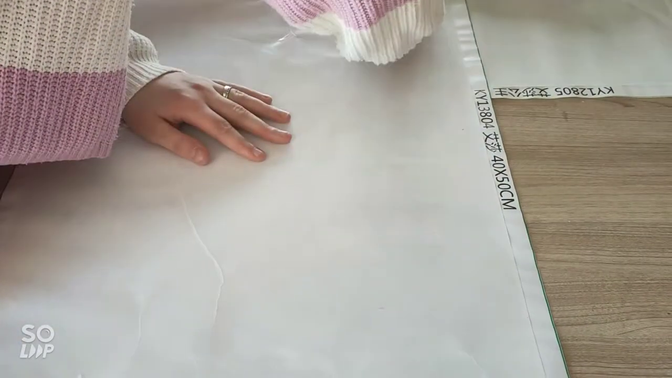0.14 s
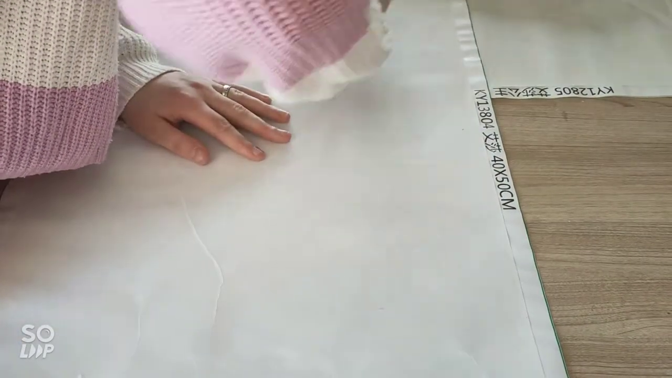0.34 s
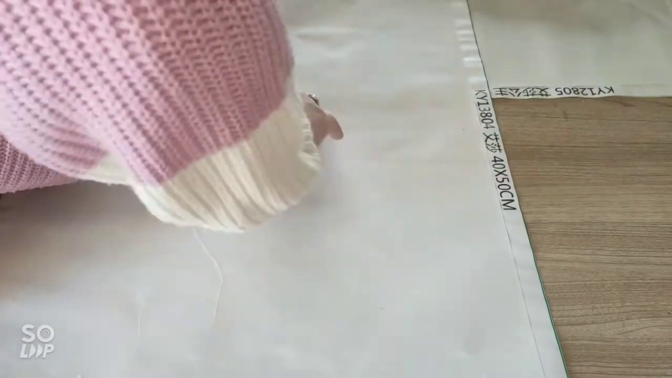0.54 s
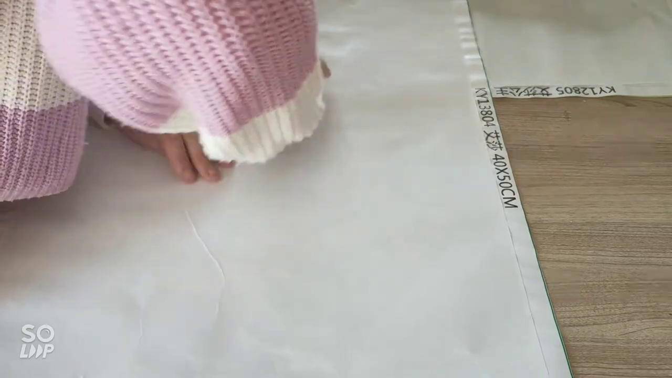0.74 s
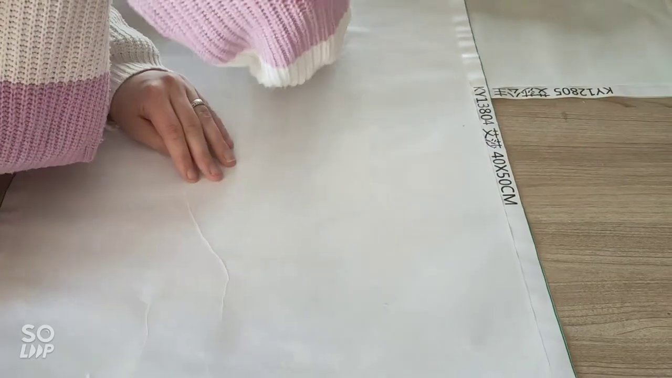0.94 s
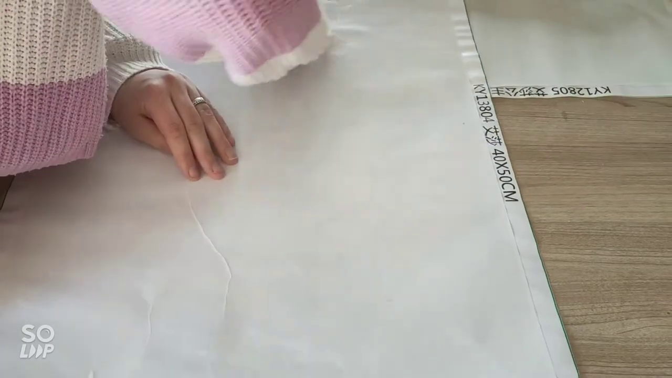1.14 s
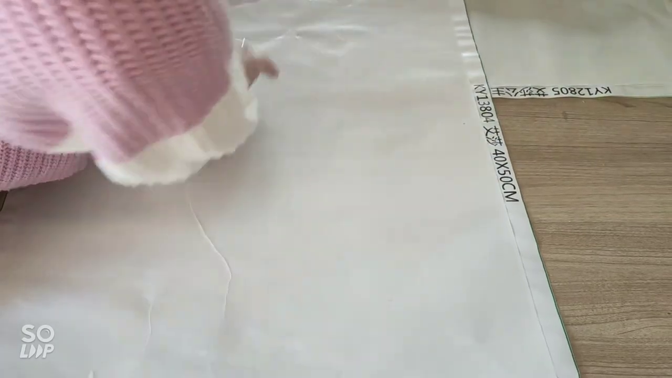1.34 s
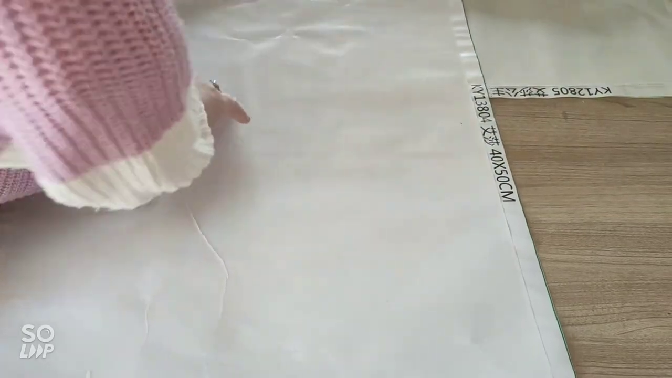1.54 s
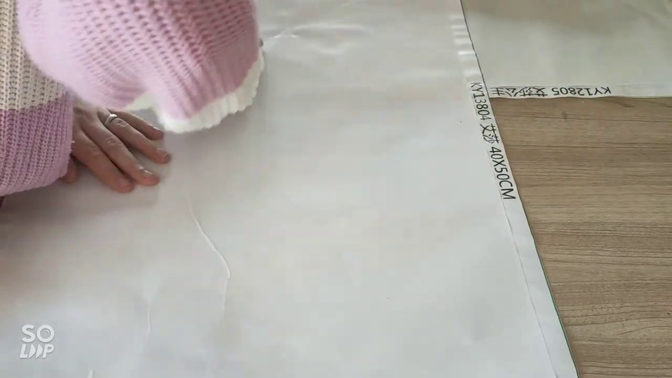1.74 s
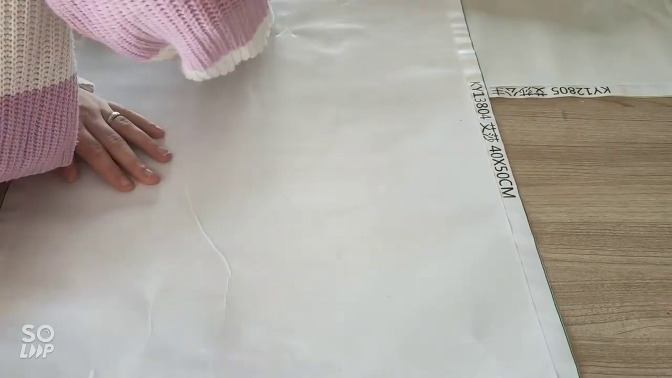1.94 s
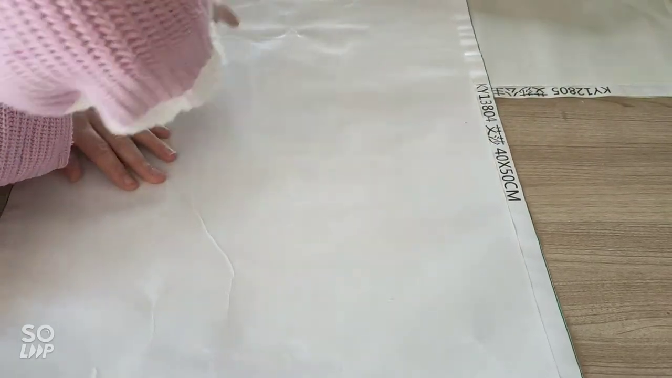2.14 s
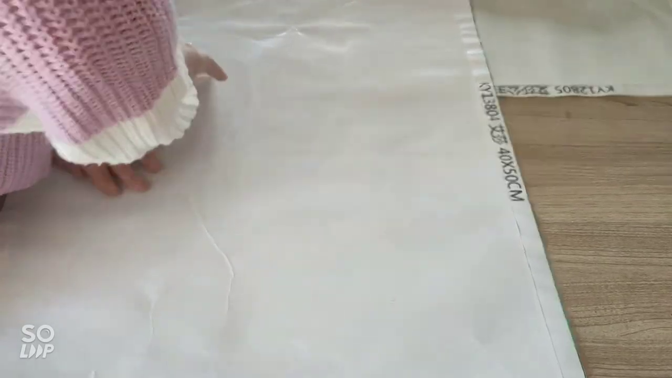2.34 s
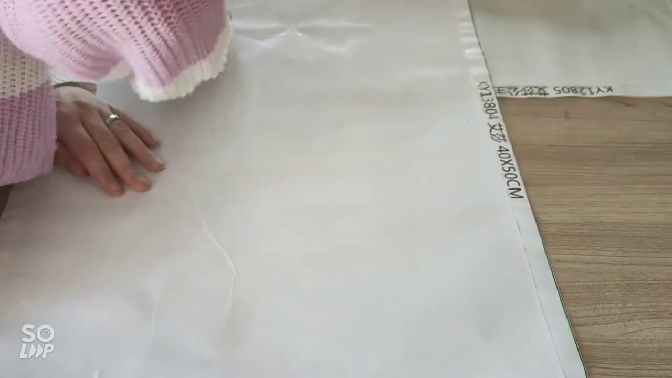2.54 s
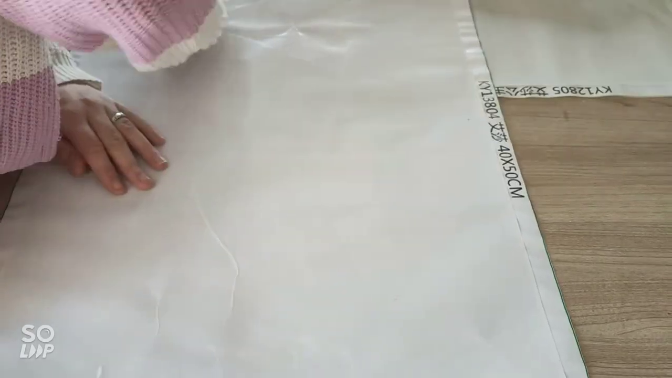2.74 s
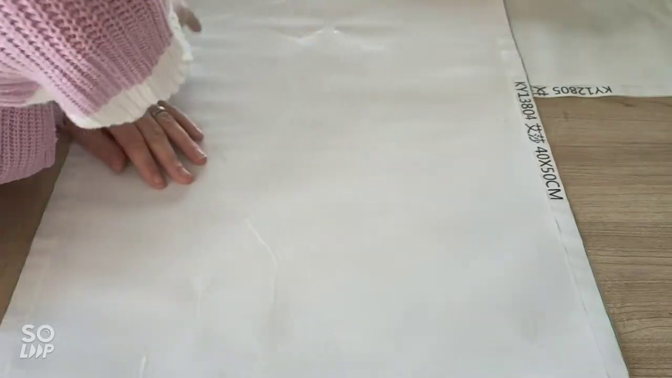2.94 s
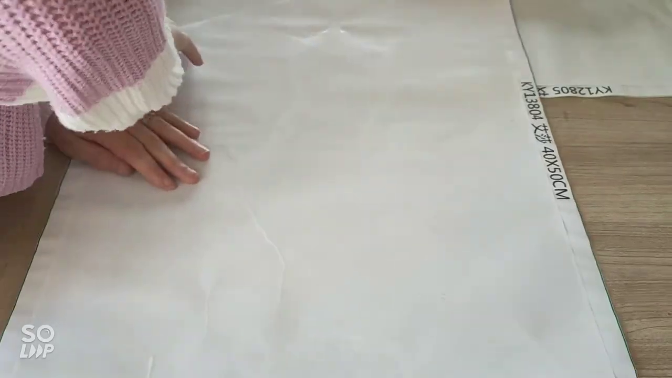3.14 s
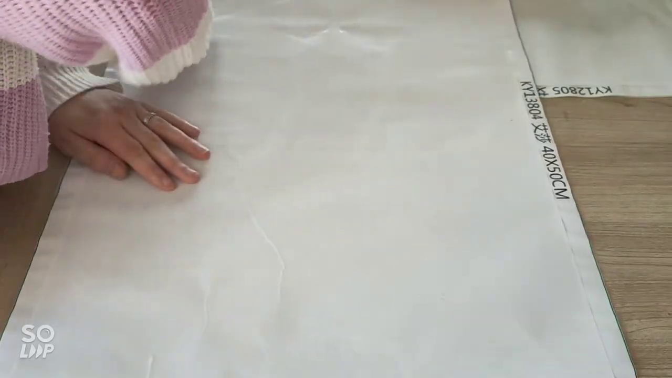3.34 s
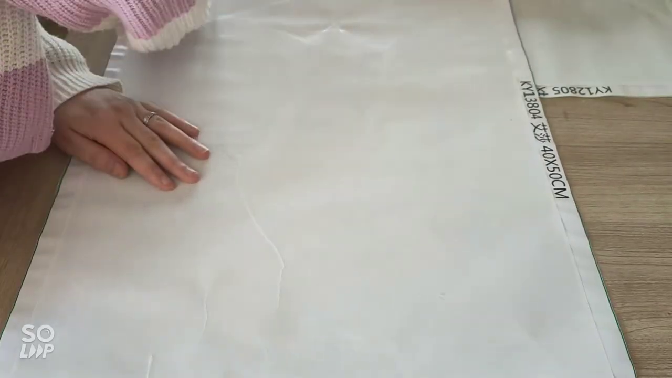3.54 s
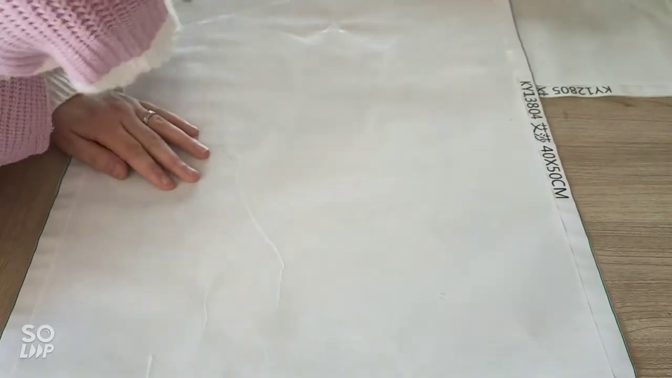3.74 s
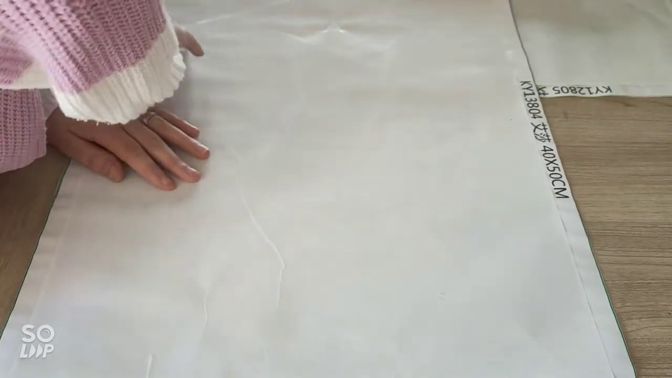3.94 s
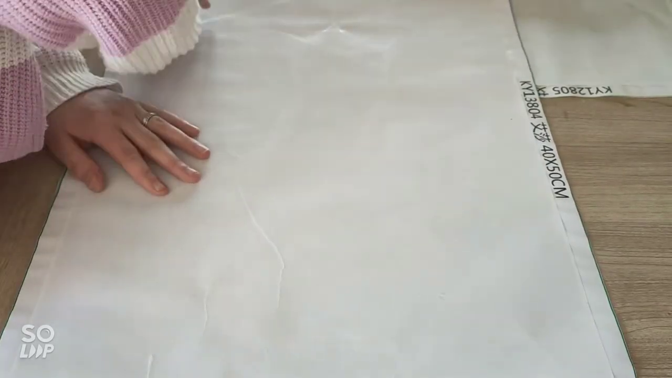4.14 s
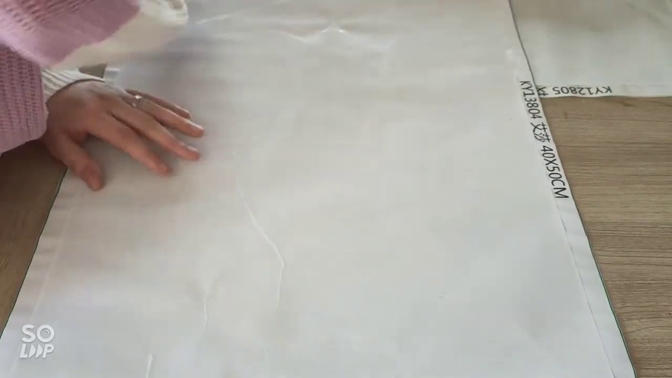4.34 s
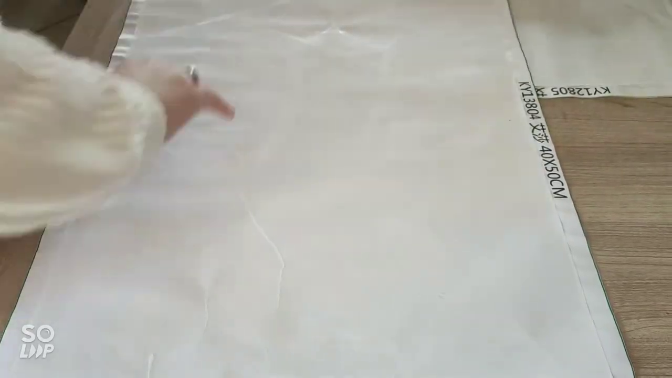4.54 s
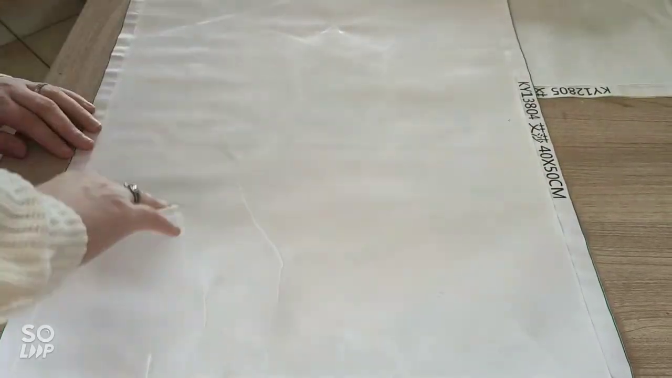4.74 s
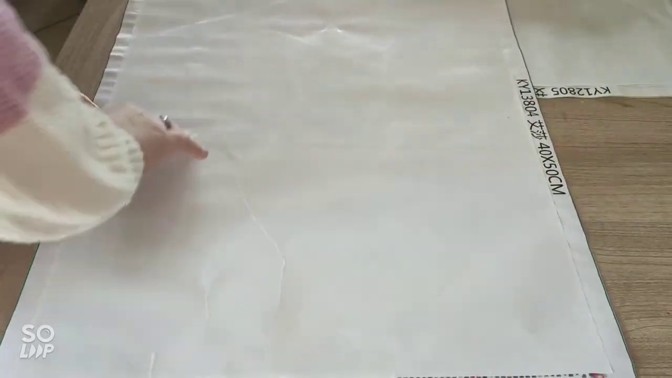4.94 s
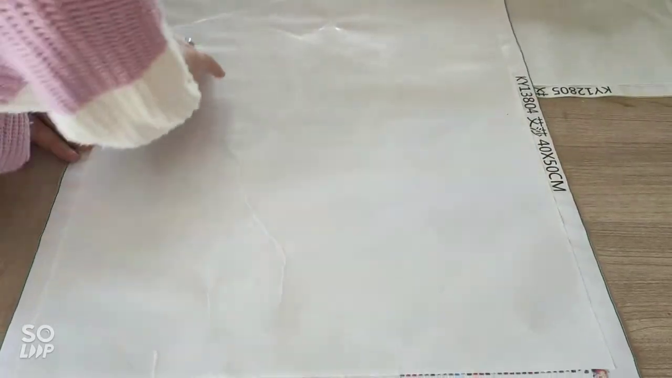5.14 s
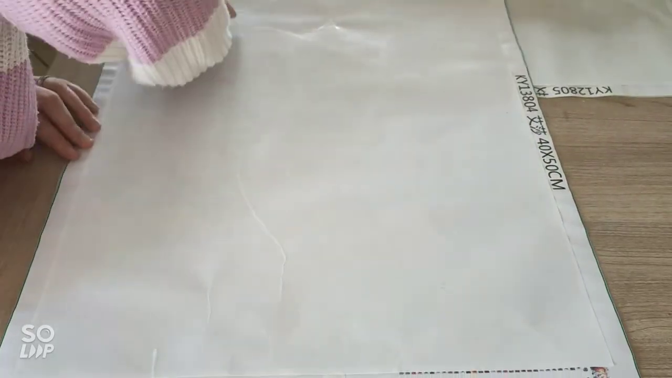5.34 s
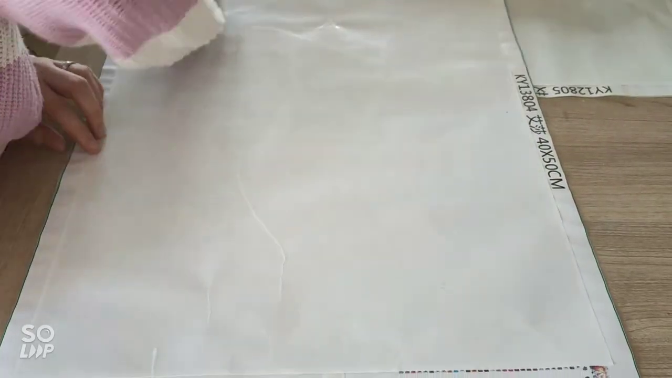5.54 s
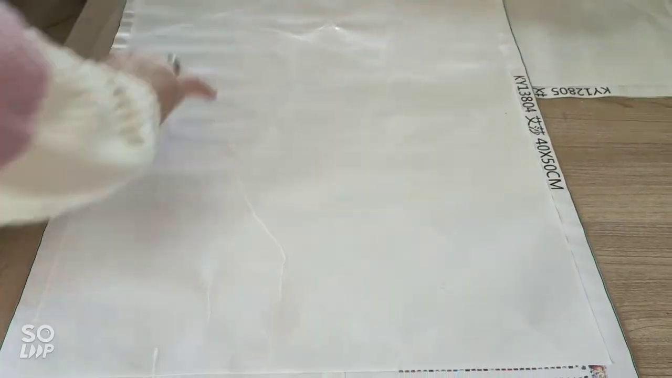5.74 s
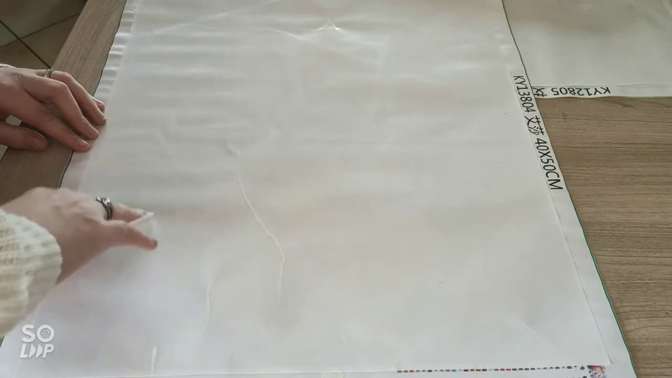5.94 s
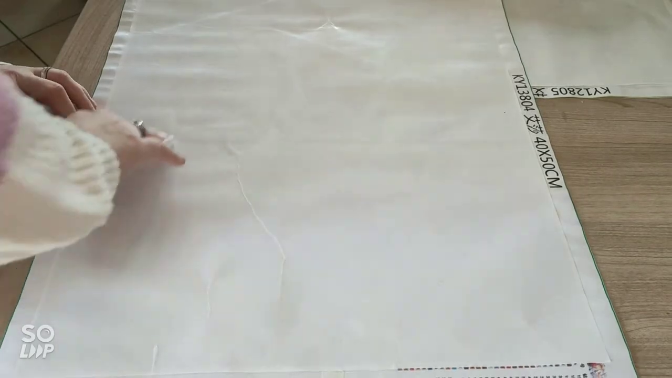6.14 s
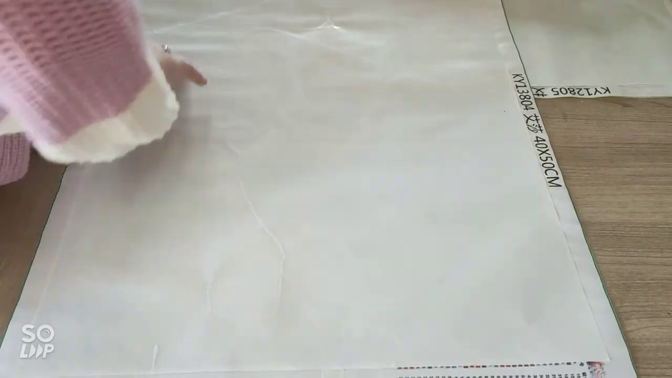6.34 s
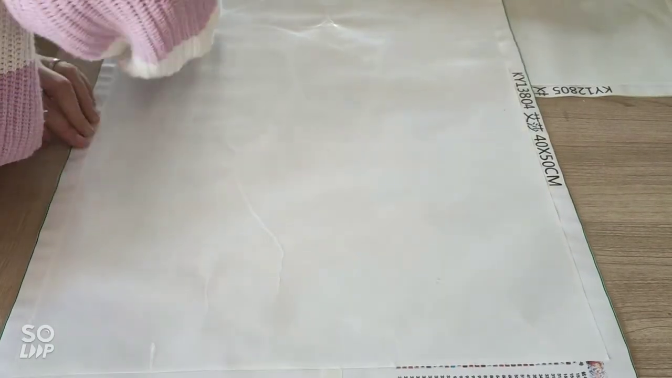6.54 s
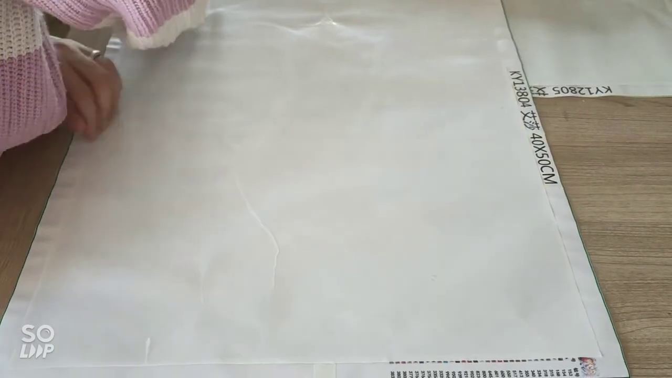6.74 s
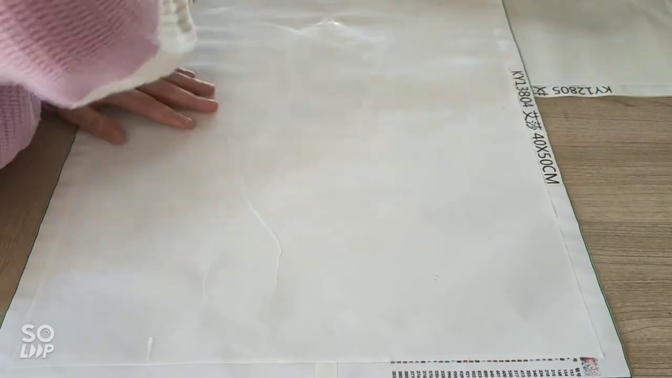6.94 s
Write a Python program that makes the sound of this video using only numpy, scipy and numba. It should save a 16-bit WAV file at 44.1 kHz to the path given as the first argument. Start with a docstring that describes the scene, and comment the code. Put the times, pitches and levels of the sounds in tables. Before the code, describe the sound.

Hands pat and smooth a paper sheet on a wooden table, with repeated soft thumps, hissing rubs and small crinkles.

```python
"""Hands smooth release paper over a sticky canvas on a wooden table in a small room, a little left of a
close pair of microphones. It opens mid-stroke over faint room tone: skin hisses on the paper and the
sheet rumbles under the palm. The heel of the hand bumps, and creases tick as they are pressed flat.
From 0.6 s the hand lands seven times, each time with a pat that thumps the table, and slides away.
The last two strokes are longer, and a few light brushes end it at about 7 s."""
import sys
import numpy as np
from scipy import signal
from scipy.fft import rfft, irfft, next_fast_len
from scipy.io import wavfile
from scipy.ndimage import map_coordinates
from numba import njit

SR = 44100
rng = np.random.default_rng(int(sys.argv[2]) if len(sys.argv) > 2 else 0)


def file_out(sig):
    """Save sig as 16-bit WAV at sys.argv[1]."""
    # one column per channel
    cols = np.atleast_2d(sig).T
    # limit, then scale
    lim = np.clip(cols, -1, 1)
    pcm = np.round(lim * 32767).astype(np.int16)
    wavfile.write(sys.argv[1], SR, pcm)


N = 312669
TIME = np.arange(N) / SR

# Slides of the palm: (time when fastest [s], run-up [s], run-out [s], skin hiss [dB], fine fizz [dB],
# paper scrape [dB], sheet rumble [dB], table rumble [dB], pressure gained on the way [dB],
# hiss centre [Hz], pitch that the palm favours in the sheet [Hz])
STROKES = [(0.02, 0.13, 0.19, -44.5, -54.5, -48, -56, -58, -12, 5940, 434),
           (0.88, 0.28, 0.23, -44.5, -51.5, -50, -52, -54, 12.5, 5720, 493),
           (1.769, 0.25, 0.26, -43, -51.5, -50.5, -52.5, -56.5, 6.5, 6760, 527),
           (2.58, 0.22, 0.2, -42, -57.5, -47.5, -50.5, -53.5, -0.5, 5950, 414),
           (3.422, .26, 0.2, -44, -56.5, -51.5, -57.5, -66, 4.5, 6000, 506),
           (4.15, .21, .21, -42.5, -56.5, -50, -61.5, -72.5, -1.5, 6000, 500),
           (5.162, .39, .42, -43, -54.5, -49.5, -51, -58, -10.5, 6300, 466),
           (6.5, 0.48, 0.38, -42, -55, -51, -57, -65.5, -6.5, 5700, 456)]


def from_db(db):
    """Decibels to gain."""
    return 10 ** (np.asarray(db) / 20)


def unit_rms(x):
    """Scale to unit rms."""
    return x / np.sqrt(np.mean(x ** 2) + 1e-20)


def unit_energy(x):
    """Scale a short sound to the energy of one millisecond at full level."""
    return x / np.sqrt(np.sum(x ** 2) * 1000 / SR)


def at_hz(points, hz):
    """Read a table on a log-frequency axis."""
    known_hz, values = np.transpose(points)
    return np.interp(np.log(np.maximum(hz, 1)), np.log(known_hz), values)


def in_time(rows):
    """The columns of a curve at every sample."""
    times, *columns = np.transpose(rows)
    return [np.interp(TIME, times, column) for column in columns]


def add(track, s, sound):
    """Mix a sound in at time s."""
    start = max(0, int(s * SR))
    track[start:start + len(sound)] += sound[:max(0, N - start)]


def drift(per_s):
    """A random curve of spread 1 that turns about per_s times a second."""
    knots = rng.standard_normal(N // 8)
    return 1.22 * np.interp(TIME * per_s, np.arange(len(knots)), knots)


def arch(offset, drop_db, shape):
    """A gain that is 1 at offset 0 and drop_db down at -1 and 1; a high shape flattens its top."""
    return from_db(-np.minimum(drop_db * np.abs(offset) ** shape, 100))


def coloured(x, spectrum, share=1, size=2048):
    """Minimum-phase filter that follows a spectrum, its decibels scaled by share."""
    gains = from_db(share * at_hz(spectrum, np.fft.rfftfreq(size, 1 / SR)))
    cepstrum = irfft(np.log(gains))
    cepstrum[1:size // 2] *= 2
    cepstrum[size // 2 + 1:] = 0
    return signal.oaconvolve(x, irfft(np.exp(rfft(cepstrum))))[:len(x)]


def resonance(x, hz, width_hz):
    """Two-pole resonance with gain 1 at its peak."""
    r = np.exp(-np.pi * width_hz / SR)
    feedback = [1, -2 * r * np.cos(2 * np.pi * hz / SR), r * r]
    return signal.lfilter(np.array([1, 0, -1]) * (1 - r * r) / 2, feedback, x)


@njit
def gliding_resonance(x, hz, width_hz):
    """Two-pole resonance whose centre is given for every sample."""
    r = np.exp(-np.pi * width_hz / SR)
    feedback = 2 * r * np.cos(2 * np.pi * hz / SR)
    y = np.zeros(len(x))
    for i in range(2, len(x)):
        y[i] = (1 - r * r) / 2 * (x[i] - x[i - 2]) + feedback[i] * y[i - 1] - r * r * y[i - 2]
    return y


def diffuse_noise(size, alike_below_hz=650):
    """Sound from all sides: alike at both microphones in the bass, unrelated in the treble."""
    mid, side = rfft(rng.standard_normal((2, size)))
    alike = 1 / (1 + (np.fft.rfftfreq(size, 1 / SR) / alike_below_hz) ** 2)
    return irfft(np.sqrt(1 + alike) * mid + np.sqrt(1 - alike) * side * [[1], [-1]], size)


def room_tone(level_db=-66):
    """The small room's faint, steady background, all around the microphones."""
    # Colour of the quiet room: (frequency [Hz], level [dB])
    spectrum = [(20, 5.5), (60, 17), (100, 7.5), (200, 1.5), (400, -4), (700, 0), (1500, -5), (4000, -10),
                (7500, -5), (9000, -15), (12500, -15.5), (14500, -8), (16000, -5)]
    noise = diffuse_noise(next_fast_len(N))[:, :N]
    return from_db(level_db) * unit_rms(np.array([coloured(side, spectrum) for side in noise]))


def hand_gains(lift_db_per_s=128):
    """Speed drives the gains of hiss and fizz; pressure those of scrape, sheet and table rumble."""
    # Fingers and cuff brush the paper: (time [s], half length [s], hiss [dB], scrape [dB], rumble [dB])
    brushes = [(0.171, 0.033, -56, -52, -46.5), (0.33, 0.033, -60, -54.5, -56.5), (0.5, 0.4, -64, -74, -78),
               (1.063, 0.056, -50, -49, -48), (1.213, 0.049, -49, -45, -53.5),
               (1.28, 0.22, -60.5, -91, -79), (1.506, 0.096, -53.5, -51.5, -57.5),
               (2.065, 0.25, -68.5, -65.5, -75), (2.966, 0.38, -55.5, -60.5, -86),
               (3.598, .07, -65, -62, -53), (3.691, 0.023, -48.5, -55.5, -62),
               (4.394, 0.36, -68, -71.5, -70), (5.454, 0.17, -52.5, -53, -50),
               (6.12, 0.18, -51, -51, -49.5), (6.771, 0.042, -63, -58.5, -51),
               (6.936, 0.076, -57, -60.5, -67), (7.08, 0.057, -55, -62.5, -82)]
    t, gains = TIME[::50], 0
    for s, run_up, run_out, *levels_db, lean_db, _, _ in STROKES:
        speed = arch((t - s) / np.where(t < s, run_up, run_out), drop_db=24, shape=2.3)
        way = (t - s + run_up) / (run_up + run_out) - .5   # -1/2 at the start, 1/2 at the end
        pressure = arch(2 * way, drop_db=24.5, shape=3.83) * from_db(lean_db * np.clip(way, -.5, .5))
        off_paper_s = np.clip(np.maximum(s - run_up - t, t - s - run_out), 0, 1)
        contact = from_db(-lift_db_per_s * off_paper_s)
        drives = [speed, speed ** 0.93, pressure * speed ** 0.053, pressure, pressure]
        gains = gains + contact * from_db(levels_db)[:, None] * drives
    for s, half_length, hiss_db, scrape_db, rumble_db in brushes:
        fizz_db, table_db = hiss_db - 11, rumble_db - 11.5
        touch = arch((t - s) / half_length, drop_db=28, shape=1.26)
        gains = gains + from_db([hiss_db, fizz_db, scrape_db, rumble_db, table_db])[:, None] * touch
    return [np.interp(TIME, t, gain) for gain in gains]


def hand_pitches(hiss_sag_octaves=0.096, palm_rise_octaves=0.64):
    """During a stroke the hiss sinks and the palm's pitch rises; both return before the next."""
    sag, rise = 2 ** (hiss_sag_octaves / 2), 2 ** (palm_rise_octaves / 2)
    points = []
    for s, run_up, run_out, *_, hiss_hz, palm_hz in STROKES:
        points.append((s - run_up, hiss_hz * sag, palm_hz / rise))
        points.append((s + run_out, hiss_hz / sag, palm_hz * rise))
    return in_time(points)


def slips(per_s, spread_db):
    """Friction: countless tiny slips of uneven size."""
    happens = rng.random(N) < per_s / SR
    sizes = from_db(spread_db * np.clip(rng.standard_normal(N), -2, 2))
    return happens * np.sign(rng.random(N) - .5) * sizes


def skin_friction(hiss_gain, fizz_gain, scrape_gain, hiss_hz, width_hz, broad_share):
    """Skin slides on paper: a hiss that follows the hand, a fine fizz above it, a dry scrape below."""
    # Colours of skin on paper, each: (frequency [Hz], level [dB])
    hiss_spectrum = [(1500, -22), (3000, -19), (4300, -5), (4800, 3), (5400, -3.5), (6200, -1.5),
                     (7400, -1), (8400, -8), (10000, -5.5), (16000, -25)]
    fizz_spectrum = [(5000, -26), (8500, 2.5), (11000, -1.5), (13200, -1), (15500, -4.5)]
    scrape_spectrum = [(300, -20), (900, -9), (1400, -6.5), (2100, -2), (3100, 2.5), (4200, 1.5),
                       (6000, -18.5), (12000, -32)]
    judder = from_db(1.67 * drift(per_s=450) + 0.8 * drift(per_s=45))   # the skin grips and lets go
    skin = slips(per_s=14000, spread_db=3.0) * judder
    tuned = gliding_resonance(skin, hiss_hz, width_hz)
    hiss = unit_rms(coloured(tuned + broad_share * skin, hiss_spectrum))
    fizz = unit_rms(coloured(slips(per_s=5900, spread_db=1.0) * judder, fizz_spectrum))
    scrape = unit_rms(coloured(slips(per_s=6000, spread_db=3.5) * judder, scrape_spectrum))
    return hiss_gain * hiss + fizz_gain * fizz + scrape_gain * scrape


def palm_rumble(sheet_gain, table_gain, palm_hz, wander_db=4.5, per_octave_db=7, stutter_db=3.2):
    """The palm drags on the sheet, which groans in its resonances, and its weight stirs the table."""
    # Resonances of the sheet under the palm: (frequency [Hz], width [Hz], level [dB])
    sheet_modes = [(312, 37, 1.5), (369, 35, 0.5), (485, 64, -0.5), (606, 130, -2), (780, 350, 0),
                   (1053, 120, 5), (1272, 61, -6.5)]
    # Rumble of the table under the hand's weight: (frequency [Hz], level [dB])
    table_spectrum = [(20, -60), (40, -6.5), (60, -14), (95, -16.5), (130, 4), (170, -6), (260, -11),
                      (700, -37)]
    sheet, power = 0, 0
    for hz, width_hz, db in sheet_modes:
        damping_db = per_octave_db * np.abs(np.log2(hz / palm_hz))   # weaker far from the palm's pitch
        gain = from_db(db + wander_db * drift(per_s=13) - damping_db)
        sheet = sheet + gain * unit_rms(resonance(slips(per_s=2500, spread_db=4.5), hz, width_hz))
        power = power + gain ** 2
    table = unit_rms(coloured(slips(per_s=420, spread_db=4.0), table_spectrum, size=4096))
    stutter = unit_rms(from_db(stutter_db * drift(per_s=25)))
    return stutter * (sheet_gain * sheet / np.sqrt(power) + table_gain * table)


def burst(rise_s, decay_s, size=4096):
    """A quick shower of tiny contacts, with an even spectrum so that it has no pitch."""
    t = TIME[:size]
    envelope = (1 - np.exp(-t / rise_s)) * np.exp(-t / decay_s)
    x = rng.standard_normal(size)
    for _ in range(4):   # shape in time, then flatten the spectrum
        x = irfft(np.exp(1j * np.angle(rfft(x * envelope))))
    return x * np.sqrt(envelope)


def thud(contacts, hz, width_hz):
    """A dull blow: contacts heard through a narrow and a wide resonance on one pitch."""
    return unit_energy(resonance(resonance(contacts, hz, width_hz), hz, 3 * width_hz))


def table_thump(rise_s, size=16384):
    """The wooden table rings briefly in its low modes after a push."""
    # Modes of the struck table and sheet: (frequency [Hz], level [dB], time to fall 60 dB [s])
    modes = [(60, -5, 0.074), (82, 7.5, 0.037), (121.5, -11.5, 0.13), (255, -6.5, 0.039)]
    t = TIME[:size]
    ring = sum(from_db(db - 60 * t / t60) * np.sin(2 * np.pi * hz * t) for hz, db, t60 in modes)
    return ring * (1 - np.exp(-t / rise_s)) / 2


def heel_bumps(thud_db=4):
    """The heel of the hand catches: it nudges the table, and the sheet gives a dull thud."""
    # Catches of the heel: (time [s], level [dB])
    catches = [(0.166, -41.5), (0.743, -43), (0.901, -38.5), (0.928, -43), (1.549, -43.5), (2.433, -50),
               (6.064, -44)]
    out = np.zeros(N)
    for s, db in catches:
        sheet = thud(burst(rise_s=0.0056, decay_s=0.00637), hz=135, width_hz=140)
        add(out, s, from_db(db) * table_thump(rise_s=0.0022))
        add(out, s, from_db(db + thud_db) * sheet)
    return out


def crease_ticks(crumple_db=-8, width_hz=7000):
    """A crease gives way with one tick and a short, weaker crumple."""
    # Creases snapping flat: (time [s], level [dB], centre [Hz])
    snaps = [(0.286, -55, 5030), (0.32, -54, 3000), (0.853, -25, 4200), (1.214, -32.5, 4970),
             (1.19, -44, 2600), (1.218, -29, 5530), (1.4798, -35, 4870), (1.507, -36, 8800),
             (1.554, -41, 4300), (1.8716, -30.5, 7030), (5.2876, -29, 5910), (6.754, -38.5, 5860)]
    out = np.zeros(N)
    for s, db, hz in snaps:
        tick = unit_energy(resonance(burst(rise_s=0.0011, decay_s=0.0012), hz, width_hz))
        crumple = unit_energy(resonance(burst(rise_s=0.0027, decay_s=0.0067), hz, width_hz))
        add(out, s, from_db(db) * (tick + from_db(crumple_db) * crumple))
    return out


def hand_pats(palm_delay_s=0.001142, thump_delay_s=0.00328):
    """Fingers crack on the paper, the palm squeezes out the air under it, the table knocks and thumps."""
    # Landings of the hand: (time [s], clap [dB], paper crack [dB], thump [dB], knock [dB],
    # pitch of the trapped air [Hz])
    landings = [(0.588, -24.5, -26.5, -31.5, -33, 1660), (1.479, -51, -32.5, -35.5, -39.5, 700),
                (2.3097, -19.5, -27.5, -33.5, -32.5, 1800), (3.083, -24, -29, -36, -34, 1200),
                (3.911, -18.5, -18.5, -30.5, -48, 1500), (4.768, -26.5, -29.5, -31.5, -31.5, 1300),
                (5.9761, -34, -46, -39, -34, 795)]
    # Colours of the palm's clap and the paper's crack, each: (frequency [Hz], level [dB])
    clap_spectrum = [(150, -36), (450, -7), (700, -3), (1000, -2.5), (1800, 0), (2400, -1), (3100, 0.5),
                     (4000, -2), (12000, -19.5)]
    crack_spectrum = [(800, -19.5), (2400, -2), (3100, 10), (4200, -10), (4800, 7.5), (5700, -0.5),
                      (7300, -1), (8500, -4.5), (10500, -8.5), (15000, -33)]
    out = np.zeros(N)
    for s, clap_db, crack_db, thump_db, knock_db, pocket_hz in landings:
        air = coloured(burst(rise_s=0.00088, decay_s=0.00266), clap_spectrum)
        clap = unit_energy(air + resonance(air, pocket_hz, width_hz=900))
        knock = thud(burst(rise_s=0.00053, decay_s=0.00138), hz=540, width_hz=200)
        crack = unit_energy(coloured(burst(rise_s=0.0027, decay_s=0.00142), crack_spectrum))
        add(out, s, from_db(crack_db) * crack)
        add(out, s + palm_delay_s, from_db(clap_db) * clap + from_db(knock_db) * knock)
        add(out, s + thump_delay_s, from_db(thump_db) * table_thump(rise_s=0.00016))
    return out


def close_pair(hands, shadow_above_hz=900):
    """The hands reach the left microphone first; only short waves are shadowed and differ in level."""
    # Where the hands work: (time [s], lag of the right microphone [ms], treble left minus right [dB])
    positions = [(0, 0.051, -1.5), (.75, 0.058, 1.5), (1.25, 0.16, 0), (2.4, 0.14, 3), (4.9, 0.16, 5.5),
                 (5.4, 0.14, 0.5), (6.1, 0.16, 5), (6.8, 0.15, 0.5)]
    lag_ms, left_db = in_time(positions)
    delayed = map_coordinates(hands, [(TIME - lag_ms / 1000) * SR], order=5)
    pair = np.array([hands, delayed])
    treble = signal.sosfilt(signal.butter(1, shadow_above_hz, "high", fs=SR, output="sos"), pair)
    return pair + treble * (from_db([left_db / 2, -left_db / 2]) - 1)


def wall_echoes(x, first_echo_s=0.002, build_s=0.0008, size=24000, bands=10):
    """Dense echoes from the near walls build up and die away octave by octave."""
    # Decay of the room: (frequency [Hz], time to fall 60 dB [s])
    decay_times = [(100, 0.4), (500, 0.24), (2000, 0.35), (6000, 0.24), (15000, 0.2)]
    # Echoes against the direct sound: (frequency [Hz], level [dB])
    echo_levels = [(100, -10), (500, -5.5), (1500, -2), (3000, -4.5), (6000, -8.5), (15000, -3)]
    t, hz = TIME[:size], np.fft.rfftfreq(size, 1 / SR)
    echoes = rfft(diffuse_noise(size))
    build_up = 1 - np.exp(-np.maximum(t - first_echo_s, 0) / build_s)
    centres, response = np.geomspace(40, 16000, bands), 0
    for centre, band_weights in zip(centres, np.eye(bands)):
        band = irfft(echoes * at_hz(np.c_[centres, band_weights], hz), size)
        decay = build_up * from_db(-60 * t / at_hz(decay_times, centre))
        response = response + band * decay / np.linalg.norm(decay) * from_db(at_hz(echo_levels, centre))
    return signal.oaconvolve(x[None], response, axes=1)[:, :N]


def scene(centre_share=0.49, sheen_from_db=-43.5, sheen_growth=0.28, travel_hz=1.1):
    """At the table: hands close by on the left, paper sliding in the middle, the room all around."""
    # Balance of the two microphones: (frequency [Hz], left minus right [dB])
    balance = [(100, 0), (1300, 0.35), (2400, 0.5), (4400, 1.5), (8000, 2), (11000, -2.5), (14000, 0.5)]
    hiss_gain, fizz_gain, scrape_gain, sheet_gain, table_gain = hand_gains()
    hiss_hz, palm_hz = hand_pitches()
    broad = skin_friction(hiss_gain, fizz_gain, scrape_gain, hiss_hz, width_hz=2600, broad_share=1.0)
    hands = np.sqrt(1 - centre_share) * broad + palm_rumble(sheet_gain, table_gain, palm_hz)
    hands = hands + hand_pats() + heel_bumps() + crease_ticks()
    # In the loudest strokes a narrow sheen outgrows the broad hiss.
    sheen_gain = hiss_gain * (hiss_gain / from_db(sheen_from_db)) ** sheen_growth
    sheen = skin_friction(sheen_gain, fizz_gain, scrape_gain, hiss_hz, width_hz=1700, broad_share=0.057)
    centre = np.sqrt(centre_share) * sheen   # reaches both microphones at once
    sources = hands + centre
    turn = 2 * np.pi * travel_hz * TIME   # the echo pattern shifts as the hands travel
    echoes = wall_echoes(sources * np.cos(turn)) + wall_echoes(sources * np.sin(turn))
    left, right = close_pair(hands) + centre + echoes
    pair = np.array([coloured(left, balance, share=1 / 2), coloured(right, balance, share=-1 / 2)])
    return pair + room_tone()


def record(dry, low_cut_hz=51.5, high_cut_hz=15800):
    """On both microphones the deepest bass is rolled off and the top is cut steeply."""
    thinned = signal.sosfilt(signal.butter(5, low_cut_hz, "high", fs=SR, output="sos"), dry)
    return signal.sosfilt(signal.ellip(10, .1, 80, high_cut_hz, fs=SR, output="sos"), thinned)


dry = scene()
out = record(dry)
file_out(out)
```